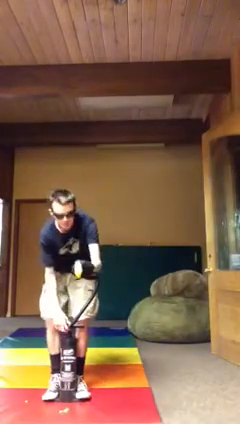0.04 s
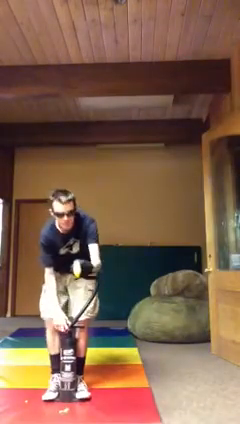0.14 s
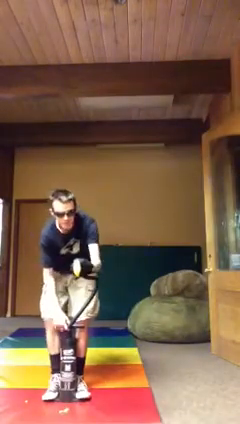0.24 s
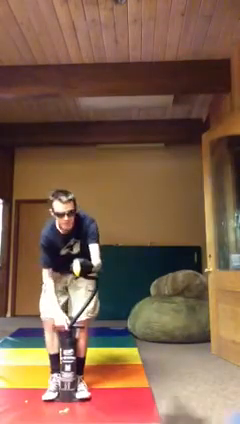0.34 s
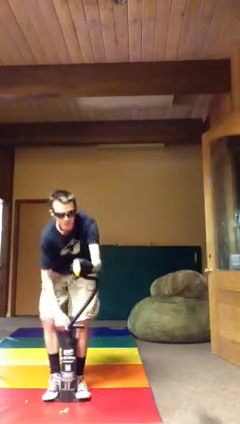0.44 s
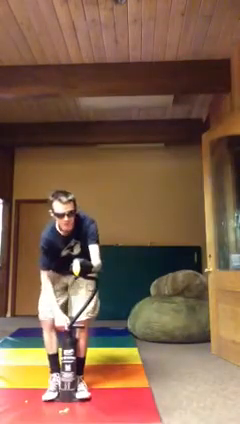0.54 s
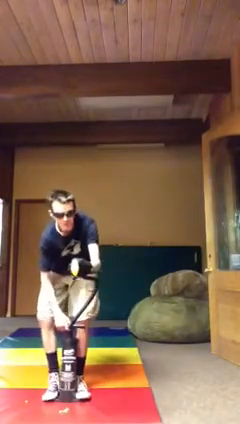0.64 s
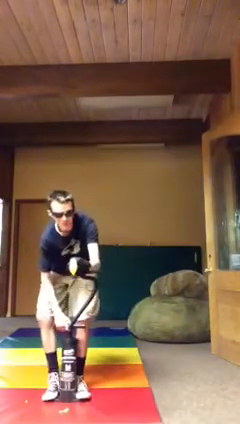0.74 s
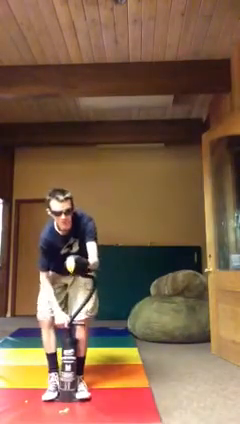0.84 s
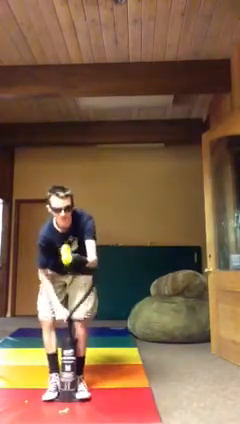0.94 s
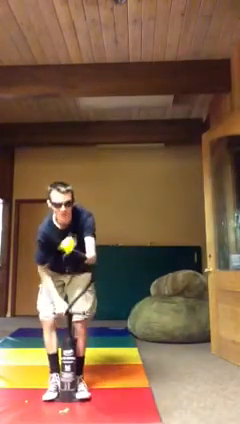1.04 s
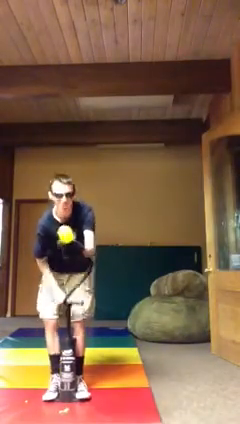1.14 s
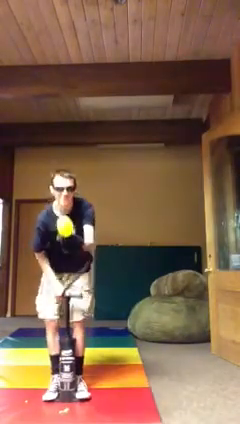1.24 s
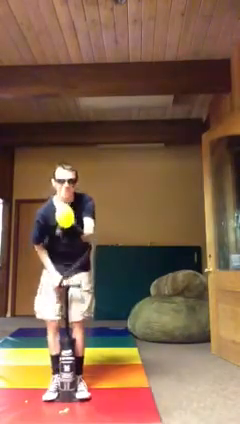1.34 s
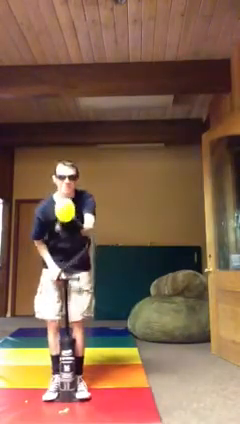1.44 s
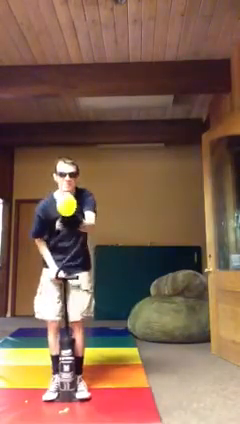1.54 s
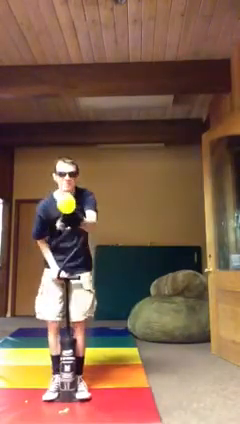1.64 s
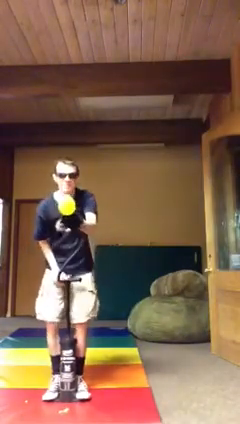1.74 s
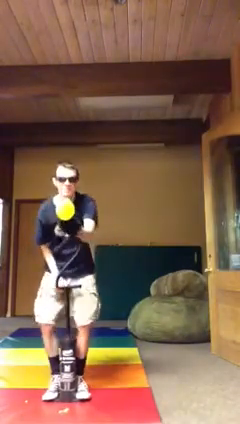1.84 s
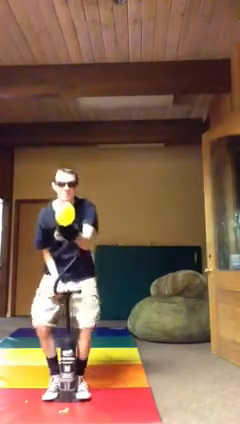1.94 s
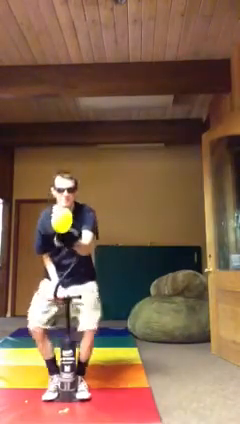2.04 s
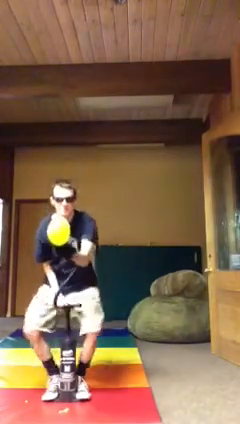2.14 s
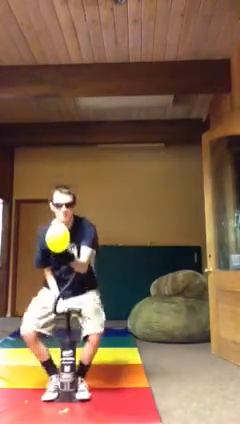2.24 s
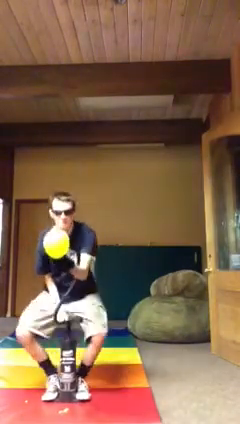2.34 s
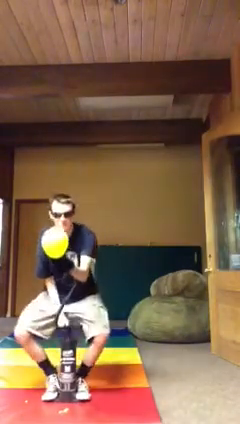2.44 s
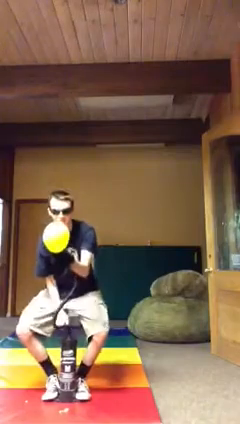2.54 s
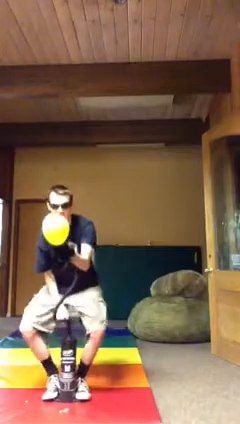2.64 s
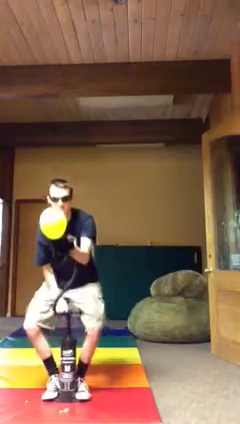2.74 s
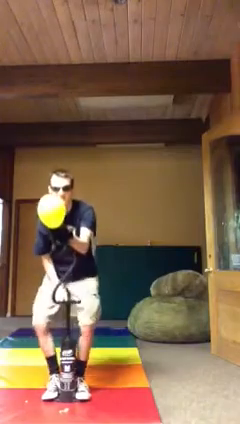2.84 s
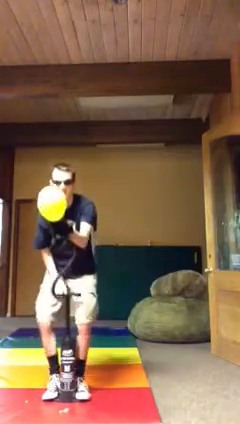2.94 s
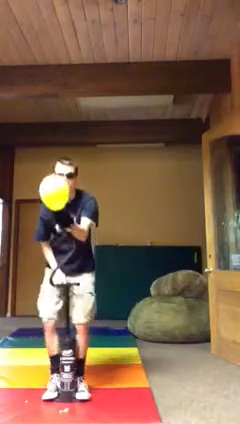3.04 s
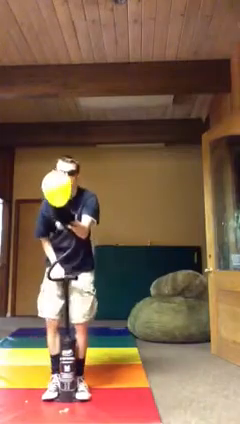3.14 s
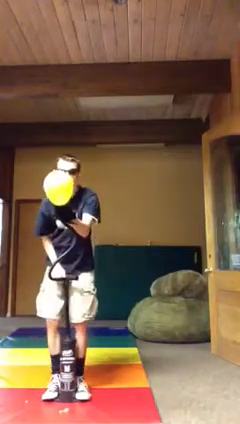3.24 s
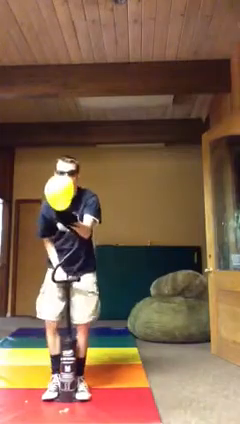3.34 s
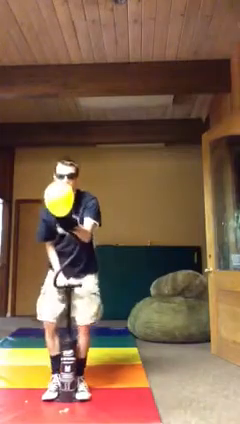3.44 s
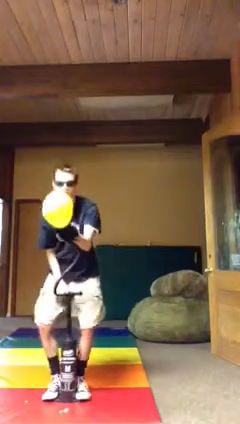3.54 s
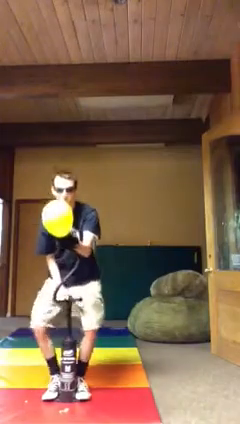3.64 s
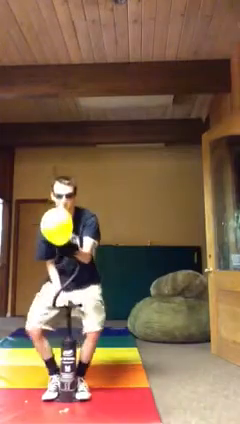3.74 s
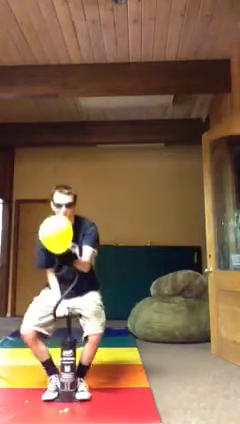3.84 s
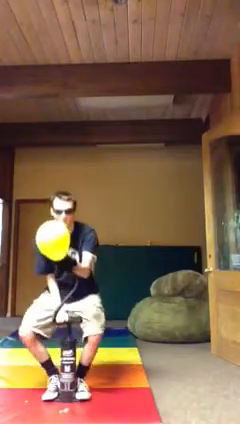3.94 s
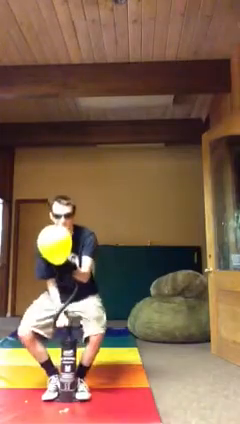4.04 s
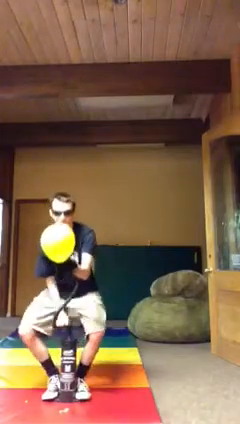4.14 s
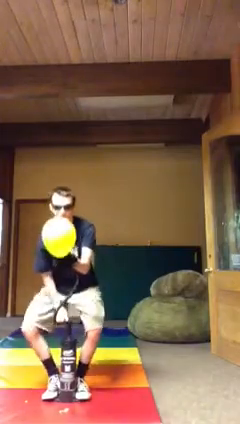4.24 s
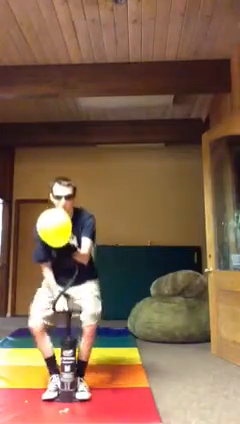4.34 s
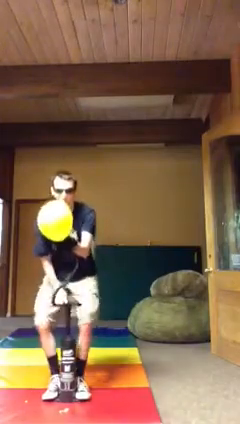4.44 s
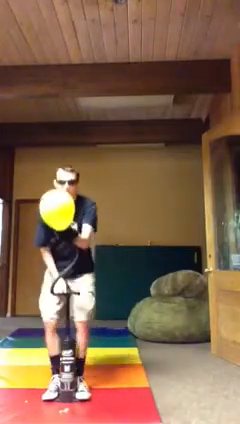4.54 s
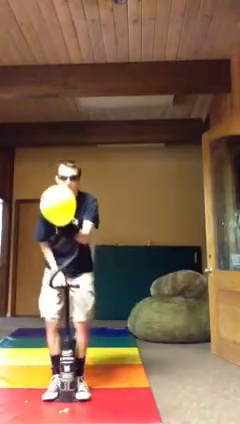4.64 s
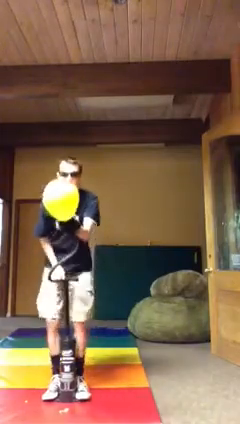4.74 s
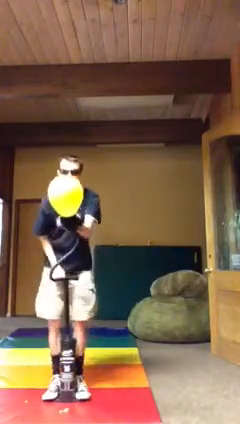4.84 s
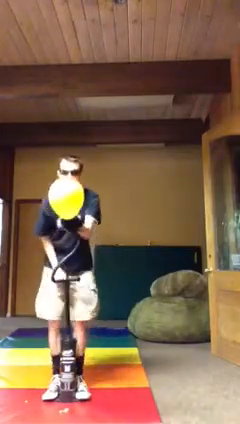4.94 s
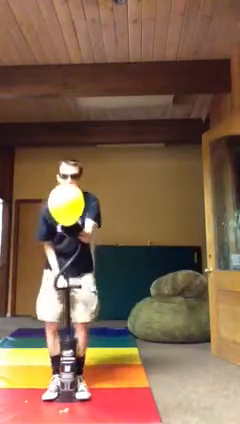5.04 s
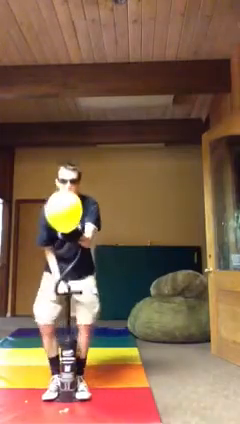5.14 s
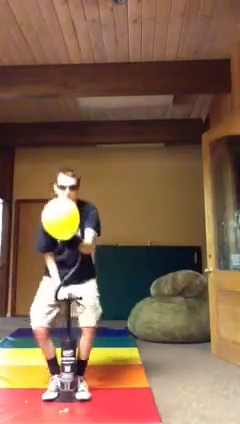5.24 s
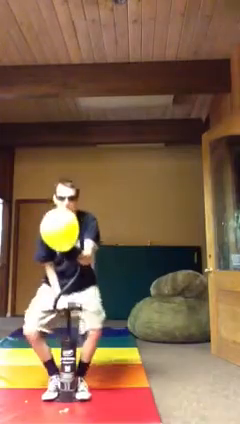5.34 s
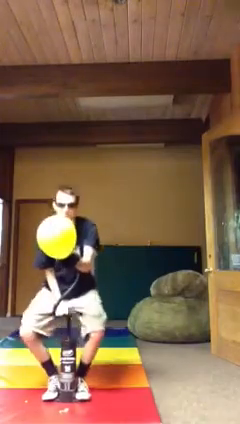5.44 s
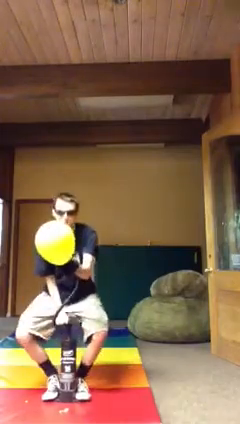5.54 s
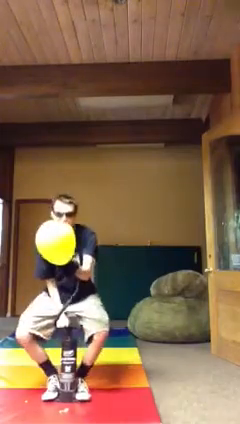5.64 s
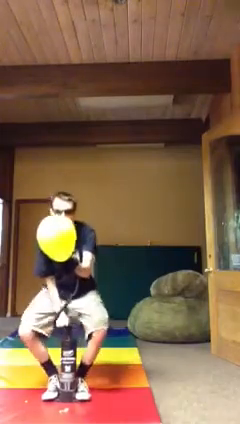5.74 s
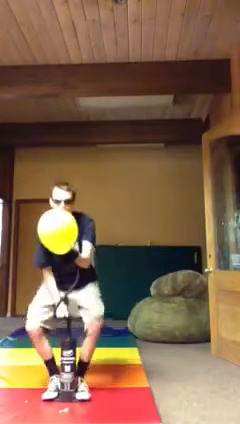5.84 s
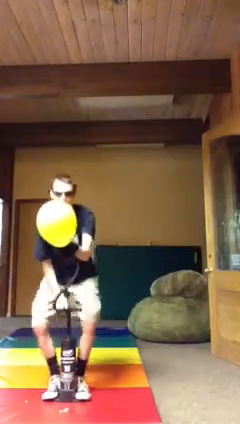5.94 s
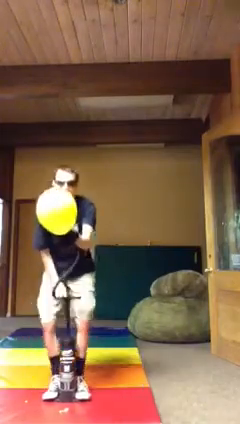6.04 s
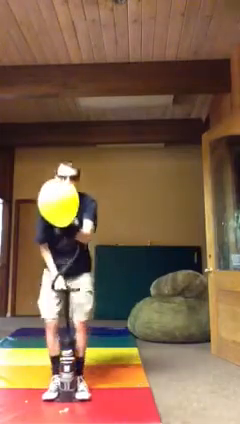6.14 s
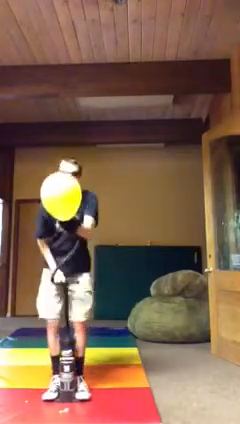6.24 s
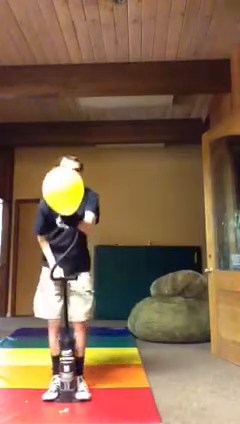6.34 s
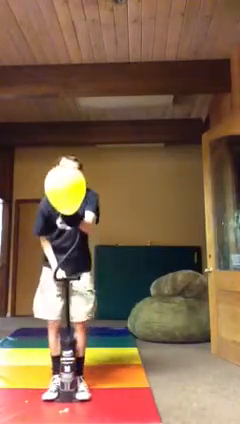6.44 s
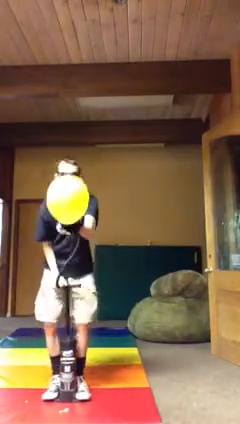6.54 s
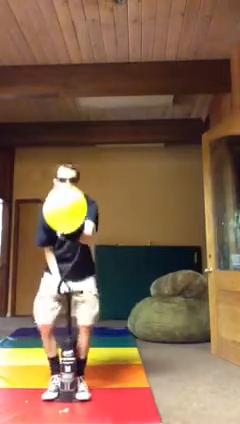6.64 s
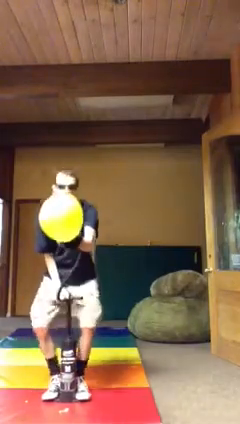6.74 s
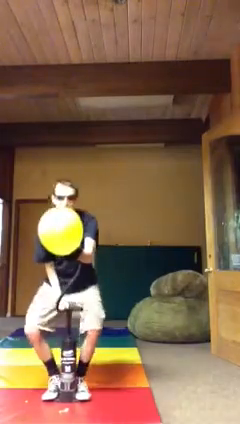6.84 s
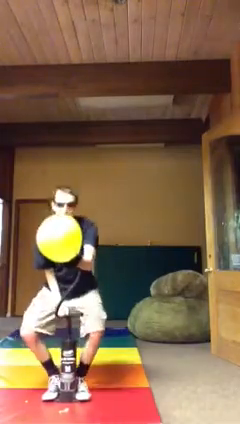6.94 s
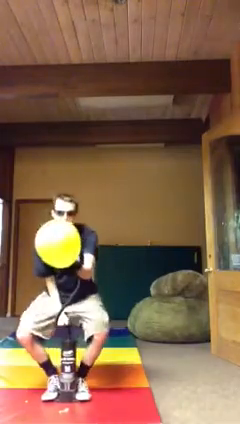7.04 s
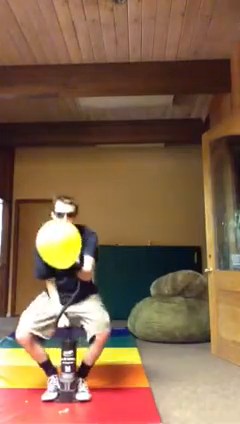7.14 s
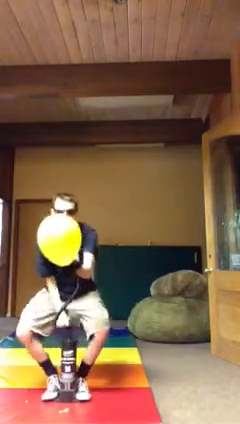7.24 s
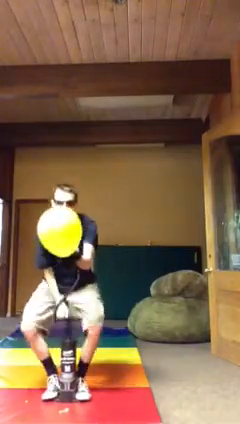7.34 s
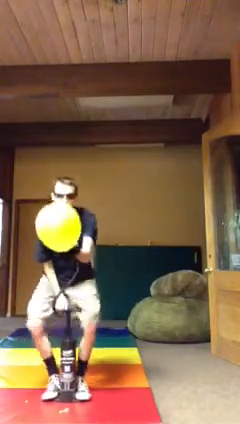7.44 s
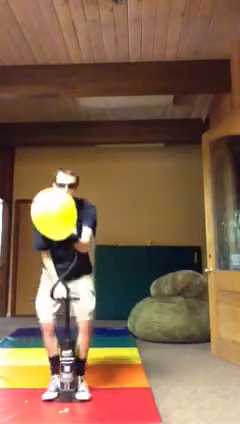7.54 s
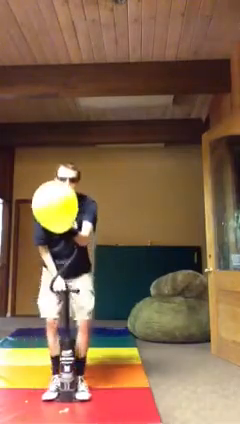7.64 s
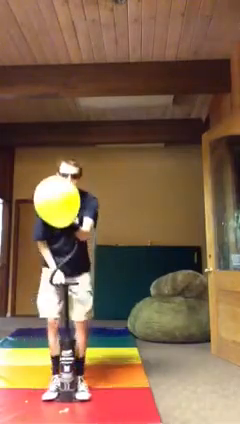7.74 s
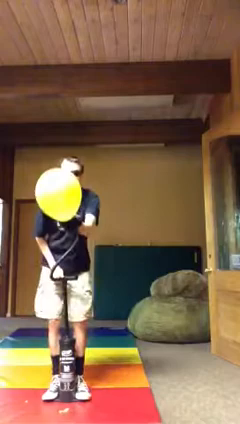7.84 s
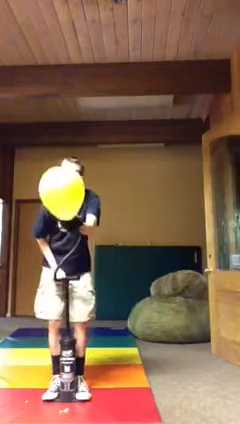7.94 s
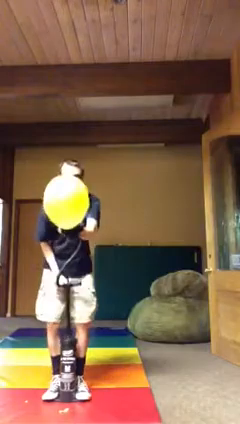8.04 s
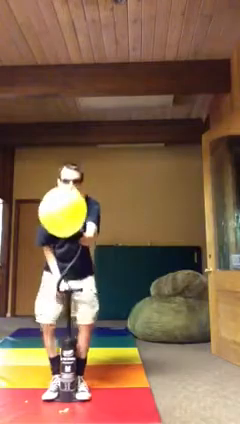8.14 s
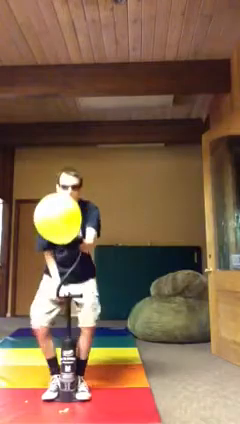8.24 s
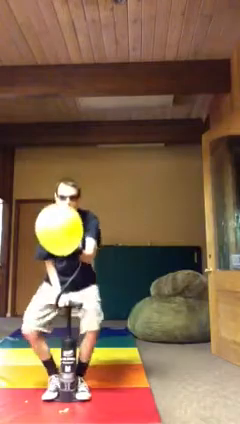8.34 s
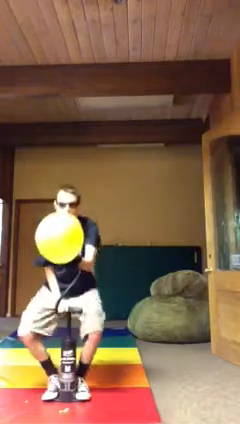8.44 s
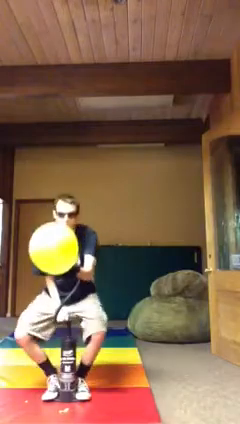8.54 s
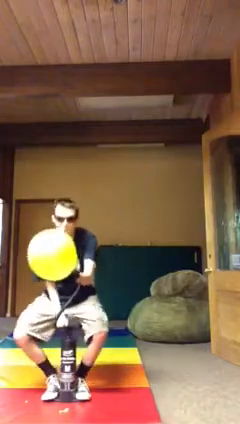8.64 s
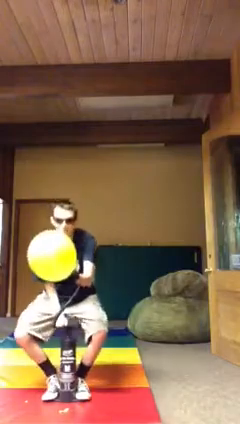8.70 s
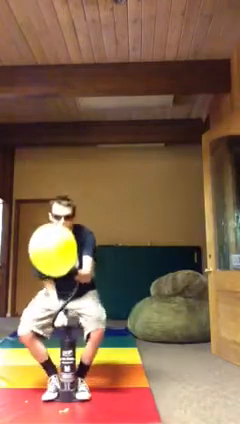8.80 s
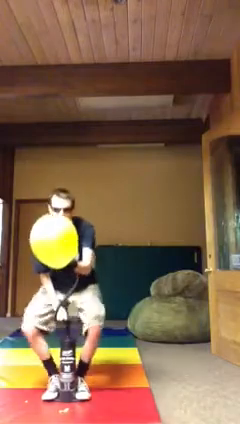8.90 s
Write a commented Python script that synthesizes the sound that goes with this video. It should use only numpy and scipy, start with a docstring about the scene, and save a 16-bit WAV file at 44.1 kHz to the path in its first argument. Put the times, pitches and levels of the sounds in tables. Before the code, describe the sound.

A floor hand pump fills a balloon in a quiet wood-lined room, a few metres from the microphone. After faint puffs of air, steady strokes begin. Each pull gives a hollow, sucking hiss that ends in a plastic clack; each push gives a brighter hiss that ends in a short, clicking thump. A fine hiss lingers between strokes. After five full cycles, the sound ends as another pull begins.

```python
"""A double-acting floor pump fills a balloon in a wood-lined room, a few metres from a mono microphone.
First the handle is nudged. On the pull, air hisses through the nozzle and a hollow-sounding inlet sucks,
until the piston clacks against the cap. On the push, the jet returns and a second inlet hisses thinly,
until the piston thumps on the base. The cycle repeats, a fine hiss lingering between strokes,
and the sound ends early in the sixth pull."""
import sys
import numpy as np
from scipy import signal
from scipy.fft import rfft, irfft, next_fast_len
from scipy.io import wavfile
from scipy.ndimage import map_coordinates

SR = 44100
rng = np.random.default_rng(int(sys.argv[2]) if len(sys.argv) > 2 else 0)


def store_wav(level_fs):
    """Save 16-bit WAV to argv[1]."""
    pcm = np.round(np.clip(np.atleast_2d(level_fs), -1, 1) * 32767)
    wavfile.write(sys.argv[1], SR, pcm.T.astype(np.int16))


N = 395577
TIME = np.arange(N) / SR

# Table levels are relative: the functions add their own gains.
# (start [s], inlet rise [s], jet rise [s], inlet level [dB], jet level [dB], chamber ring [dB])
PULLS = [(.87, 0.23, 0.58, -40, -33, -3.5), (2.6, 0.15, 0.34, -40.5, -36.8, 1.5),
         (4.2, 0.16, 0.31, -41.5, -37, -6), (5.78, .13, 0.31, -40, -34.5, -6),
         (7.29, 0.12, 0.28, -40.5, -35, -5.5), (8.83, 0.24, 0.25, -40, -39, 1)]
# (start [s], inlet rise [s], jet rise [s], inlet level [dB], jet level [dB],
#  jet easing [dB], flap note [dB])
PUSHES = [(1.81, .24, 0.51, -43.5, -31.5, 7.5, -3), (3.43, 0.039, 0.6, -41, -31.5, 3, -8),
          (5.03, 0.095, 0.5, -41.5, -32.2, 2, -4.5), (6.54, 0.074, 0.41, -41, -31, 3, -4),
          (8.08, 0.049, 0.41, -40.5, -33, 0.5, -6)]
# small first moves of the handle: (time [s], width [s], inlet level [dB], jet level [dB])
NUDGES = [(.27, 0.11, -68, -64.5), (.41, 0.08, -83, -65.5), (.63, 0.062, -63.5, -57.5)]
# piston impacts on cap and base: (time [s], level [dB], barrel thud [dB])
TOP_STOPS = [(1.508, -17, 2.5), (3.196, -18.5, 4.5), (4.802, -19.5, 4.5), (6.335, -19, 5.5),
             (7.851, -18, 7.5)]
BOTTOM_STOPS = [(2.509, -25, 6), (4.063, -22, 5), (5.661, -20.5, 3), (7.148, -20.5, 2.5), (8.695, -20, 3.5)]
# modes of cap, base and barrel (piston up, down): (frequency [Hz], level [dB], t60 [s])
CAP_MODES = [(529, -11, 0.027), (935, -13.5, 0.023), (1320, -20, 0.04), (1840, -15, .016), (2160, 2, 0.007),
             (2850, -25, 0.0089), (4270, -16, .008)]
BASE_MODES = [(1920, -14, 0.027), (2380, 1, 0.0094), (2423, 1.5, 0.0071), (3250, -18.5, 0.011)]
BARREL_UP_MODES = [(151, -30.5, 0.097), (222, -14.5, 0.077), (265, -18, 0.087), (336, -12.5, 0.063),
                   (413, -19, 0.084)]
BARREL_DOWN_MODES = [(101.5, -27, 0.25), (169, -29, 0.32), (229.4, -13.5, 0.14), (261.4, -18, 0.26),
                     (323, -7.5, 0.098), (361, -17.5, 0.088), (402.5, -24, 0.25)]
# noise spectra: (frequency [Hz], spectral level [dB])
JET_SPECTRUM = [(80, -53), (180, -21), (330, -13), (550, -22), (950, -22.5), (1700, -11.5), (2600, -8),
                (5000, 0.5), (6500, -1), (9200, 2), (10800, -0.5), (12400, 1.5), (14000, -0.5), (15200, 2)]
PULL_SPECTRUM = [(100, -56), (200, -14), (480, -12.5), (760, -1.5), (930, -9), (1130, -6.5), (1500, -2.5),
                 (2200, 1.5), (2700, 2), (3100, 6), (4800, 2.5), (6000, -4.5), (9000, -13), (15000, -24)]
PUSH_SPECTRUM = [(300, -42), (1000, -27), (2300, -12.5), (2900, -9.5), (3250, -3.5), (3900, -3.5),
                 (4700, -10), (6200, -13.5), (12000, -12)]
LEAK_SPECTRUM = [(130, -43), (330, -8), (800, -11), (2000, -7.5), (3500, -2.5), (6000, -5), (8800, 0.5),
                 (11000, 1), (13000, 0), (15000, 1)]
BACKGROUND_SPECTRUM = [(25, -10), (60, 9), (110, -0.5), (230, 6), (400, 2), (600, 0.5), (1300, -6),
                       (3300, -5.5), (15000, -11.5)]
SIZZLE_SPECTRUM = [(150, -64), (330, 5.5), (800, 2), (2000, 6), (5500, -2), (8000, -1), (15000, 1)]
RATTLE_SPECTRUM = [(100, -14), (350, -5), (700, -7.5), (1300, -6.5), (2100, 2), (3200, -8),
                   (7000, -17), (15000, -38)]
# gliding notes of chamber and inlet flap: (time into stroke [s], frequency [Hz], level [dB])
CHAMBER_GLIDE = [(.05, 1900, -2), (.15, 1900, -1), (.33, 1820, 1), (.45, 1750, -2), (.6, 1500, -3)]
FLAP_GLIDE = [(.045, 3180, -3.5), (.095, 3480, -4), (.25, 3650, -13), (.5, 3800, -11)]
# steady narrow resonances colouring the inlet hiss: (frequency [Hz], bandwidth [Hz], level [dB])
STEADY_RESONANCES = [(811, 23, 1.5), (1119, 37, 5.5), (1450, 45, 3), (1747, 19, 3), (2010, 100, -6),
                     (2330, 39, 0), (3040, 23, -23)]
# half-formed inlet whistles: (time [s], width [s], frequency [Hz], level [dB])
WHISTLES = [(1.25, 0.037, 3050, -42), (1.32, 0.21, 764, -52), (2.03, 0.04, 3260, -44),
            (4.361, 0.054, 2980, -46), (4.55, 0.044, 1627, -42), (5.92, 0.067, 3030, -44.5),
            (7.59, 0.045, 1594, -40), (7.73, 0.096, 765, -51)]
# echoes from floor, ceiling and walls: (delay [s], level [dB])
REFLECTIONS = [(.0031, -17), (.0062, -33), (0.0111, -9.5), (0.0117, -9.5), (0.015, -21), (.026, -12),
               (0.0391, -8.5)]
# reverberation time: (frequency [Hz], t60 [s])
ROOM_DECAY = [(100, 0.49), (300, 0.37), (1000, 0.31), (3000, 0.31), (8000, 0.37), (15000, 0.082)]
# microphone bass roll-off: (frequency [Hz], gain [dB])
MIC_RESPONSE = [(20, -24), (50, -21), (90, -13.5), (150, 0.5)]


def nozzle():
    """Turbulent jet noise: weak flow gives mostly sizzle, strong flow a broad hiss."""
    level_db = jet_level() + .5 * wobble(18)
    jet = amp(level_db + 1.5) * noise(JET_SPECTRUM)
    sizzle_db = np.minimum(level_db - .5, -51)  # stops growing once air flows freely
    return jet + amp(sizzle_db) * noise(SIZZLE_SPECTRUM)


def jet_level():
    """Jet level in dB follows the flow: pulls level off early, the harder pushes peak late."""
    pulls = sum(amp(db) * stroke(start, rise, curve=1.76, easing_db=2, release_s=.19)
                for start, _, rise, _, db, _ in PULLS)
    pushes = sum(amp(db) * stroke(start, rise, curve=1.31, easing_db=easing, release_s=.2)
                 for start, _, rise, _, db, easing, _ in PUSHES)
    nudges = sum(amp(db) * swell(at, width) for at, width, _, db in NUDGES)
    return 20 * np.log10(pulls + pushes + nudges + 1e-6)


def stroke(start, rise_s, curve, easing_db, release_s):
    """Displacement drives flow: it builds, eases, then decays once the piston meets a stop."""
    end = min([at for at, *_ in TOP_STOPS + BOTTOM_STOPS if at > start], default=np.inf)
    building = np.sin(np.pi / 2 * np.clip((TIME - start) / rise_s, 0, 1)) ** curve
    late = np.clip((TIME - start - rise_s) / max(end - start - rise_s, 1e-3), 0, 1)
    dying_db = 60 * np.maximum(TIME - end, 0) / release_s
    return building * amp(-easing_db * late ** 2 - dying_db)


def piston_stops(blows, plastic, barrel, crack_db, rattle_db, rattle_t60, lowest_hz):
    """Impact excitation: the piston clicks on plastic, rattles the rod and sets the barrel thudding."""
    out, t = np.zeros(N + SR), np.arange(SR // 3) / SR
    grit = noise(RATTLE_SPECTRUM)
    decay = amp(crack_db - 60 * t / .015) + amp(rattle_db - 60 * t / rattle_t60)
    for at, db, thud_db in blows:
        start = round(at * SR)
        rattle = np.roll(grit, -start)[:len(t)] * decay
        click = ring(plastic, t, attack_s=.0006, scatter_db=.5)
        thud = amp(thud_db) * ring(barrel, t, attack_s=.0039, scatter_db=2.1)
        out[start:start + len(t)] += amp(db) * (click + rattle + thud)
    # the knocks carry little bass below lowest_hz
    return signal.sosfilt(signal.butter(2, lowest_hz, "highpass", fs=SR, output="sos"), out[:N])


def ring(modes, t, attack_s, scatter_db):
    """Free vibration: a sum of damped modes whose strengths vary from blow to blow."""
    tones = sum(amp(db + scatter_db * rng.standard_normal() - 60 * t / t60) * np.cos(2 * np.pi * hz * t)
                for hz, db, t60 in modes)
    return tones * (1 - np.exp(-t / attack_s))


def pull_inlet():
    """Cavity resonance: inrushing air blows the chamber like a bottle, lower as its volume grows."""
    times, hz, levels = np.transpose(CHAMBER_GLIDE)
    ring_db, elapsed = latest_stroke(PULLS)
    centre_hz = np.interp(elapsed, times, hz) * (1 + .06 * wobble(16))
    hollow_db = ring_db + np.interp(elapsed, times, levels) + wobble(22)
    hollow = amp(hollow_db) * noise_band(centre_hz, width_hz=430)
    rush = amp(2 + .15 * wobble(22)) * noise(PULL_SPECTRUM)
    flow = sum(amp(db) * stroke(start, rise, curve=1.28, easing_db=.8, release_s=.14)
               for start, rise, _, db, _, _ in PULLS)
    nudges = sum(amp(db) * swell(at, width) for at, width, db, _ in NUDGES)
    edge_tone = amp(-13.5 + 1.8 * wobble(9)) * noise_band(2800 * (1 + .1 * wobble(6)), width_hz=49)
    return (flow + nudges) * (rush + hollow + edge_tone)


def push_inlet():
    """Flow noise at a valve: as the flap lifts, an airy note rises and a thin hiss fills in."""
    times, hz, levels = np.transpose(FLAP_GLIDE)
    note_db, elapsed = latest_stroke(PUSHES)
    note_gain = amp(note_db + np.interp(elapsed, times, levels))
    note = note_gain * noise_band(np.interp(elapsed, times, hz), width_hz=74)
    lifting_db = -9 * np.exp(-np.abs(elapsed) / .07)
    hiss = amp(1.5 + lifting_db + .84 * wobble(23)) * noise(PUSH_SPECTRUM)
    flow = sum(amp(db) * stroke(start, rise, curve=.76, easing_db=.8, release_s=.16)
               for start, rise, _, db, *_ in PUSHES)
    return flow * (hiss + note)


def colour_inlet(x):
    """Resonance: steady narrow bands reinforce the inlet hiss."""
    return filtered(x, lambda hz: 1 + sum(
        amp(db) * 1j * hz * width / (centre ** 2 - hz ** 2 + 1j * hz * width)
        for centre, width, db in STEADY_RESONANCES))


def whistles():
    """Edge tones: brief airy notes at the lip of the inlet."""
    return sum(amp(db) * swell(at, width) * noise_band(hz, width_hz=47) for at, width, hz, db in WHISTLES)


def leak():
    """Pressure-driven flow: once the balloon holds air the nozzle hisses, a little louder as it fills."""
    start_s, rise_s, db_per_s = 1, .067, .12
    onset = np.clip((TIME - start_s) / rise_s, 0, 1) ** 2
    return onset * amp(-42 + db_per_s * TIME + .64 * wobble(12)) * noise(LEAK_SPECTRUM)


def room(x, early_db, tail_db):
    """Superposition of direct sound, dull reflections and a tail that shifts as body and balloon move."""
    dull = signal.lfilter(*signal.butter(1, 3500, fs=SR), x)
    early = sum(amp(db + early_db) * np.pad(dull, (round(delay * SR), 0))[:N] for delay, db in REFLECTIONS)
    blend_angle = 4 * TIME
    tail = np.cos(blend_angle) * reverberation(x) + np.sin(blend_angle) * reverberation(x)
    return (x + early + amp(tail_db) * tail) / np.sqrt(1 + amp(tail_db) ** 2)


def reverberation(x):
    """A diffuse field decays exponentially, each band at its own rate."""
    hz, t, bands = signal.stft(rng.standard_normal(SR // 2), SR, nperseg=256)
    decay = amp(-60 * t / along(ROOM_DECAY, hz)[:, None])
    tail = signal.istft(bands * decay, SR, nperseg=256)[1]
    response = np.pad(tail / np.linalg.norm(tail), (round(.007 * SR), 0))
    return signal.oaconvolve(x, response)[:N]


def background():
    """Ambient noise: the steady floor of the still room."""
    return amp(-64) * noise(BACKGROUND_SPECTRUM)


def latest_stroke(rows):
    """Tone level (last column) and age in seconds of the latest stroke, at each sample."""
    starts, *_, tone_db = np.transpose(rows)
    index = np.maximum(np.searchsorted(starts, TIME) - 1, 0)
    return tone_db[index], TIME - starts[index]


def swell(at, width):
    """Gaussian envelope around a moment."""
    return np.exp(-((TIME - at) / width) ** 2)


def wobble(rate):
    """Smooth random modulation, rate knots a second."""
    return map_coordinates(rng.standard_normal(int(N * rate / SR) + 4), [TIME * rate])


def noise_band(centre_hz, width_hz):
    """Modulation shifts low-passed noise to a centre that may move; rms 1."""
    band = filtered(rng.standard_normal(N), lambda hz: 1 / np.sqrt(1 + (hz / width_hz) ** 4))
    phase = 2 * np.pi * np.cumsum(centre_hz * np.ones(N)) / SR
    return unit(band * np.cos(phase))


def noise(spectrum):
    """Spectral shaping of white noise; rms 1."""
    return unit(filtered(rng.standard_normal(N), lambda hz: amp(along(spectrum, hz))))


def filtered(x, response):
    """Linear filtering: the spectrum of x times a frequency response."""
    size = next_fast_len(N + SR // 2)
    return irfft(rfft(x, size) * response(np.fft.rfftfreq(size, 1 / SR)), size)[:N]


def along(points, hz):
    """Interpolation on a log frequency axis."""
    knots_hz, values = np.transpose(points)
    return np.interp(np.log(hz + 1), np.log(knots_hz + 1), values)


def amp(db):
    """Decibels to gain."""
    return 10 ** (np.asarray(db) / 20)


def unit(x):
    """Normalisation to rms 1."""
    return x / np.sqrt(np.mean(x ** 2) + 1e-20)


def scene():
    """Superposition: air and piston sound in the room, over its quiet background."""
    air = nozzle() + leak() + colour_inlet(pull_inlet() + push_inlet()) + whistles()
    top = piston_stops(TOP_STOPS, CAP_MODES, BARREL_UP_MODES,
                       crack_db=-4.5, rattle_db=-15, rattle_t60=.13, lowest_hz=121)
    bottom = piston_stops(BOTTOM_STOPS, BASE_MODES, BARREL_DOWN_MODES,
                          crack_db=-33, rattle_db=-16, rattle_t60=.11, lowest_hz=105)
    mono = room(air, early_db=-24, tail_db=-9.5)
    mono += room(top, early_db=-8.5, tail_db=-4)
    mono += room(bottom, early_db=-8, tail_db=-9)
    mono += background()
    return np.array([mono, mono])


def record(dry):
    """Band limiting: a small microphone passes little bass and nothing above top_hz."""
    top_hz = 15450
    response = lambda hz: amp(along(MIC_RESPONSE, hz)) * (hz < top_hz)
    return np.array([filtered(channel, response) for channel in dry])


dry = scene()
out = record(dry)
store_wav(out)
```